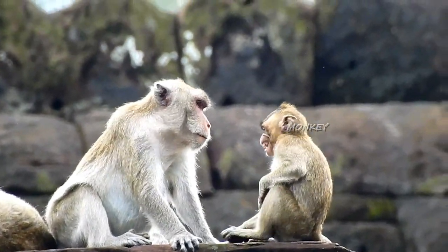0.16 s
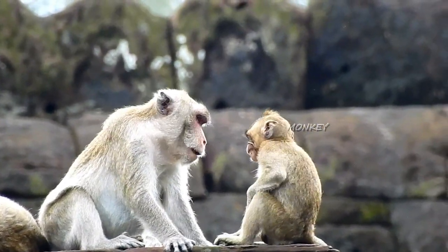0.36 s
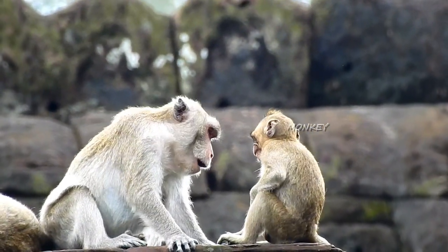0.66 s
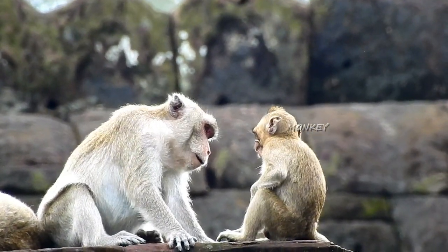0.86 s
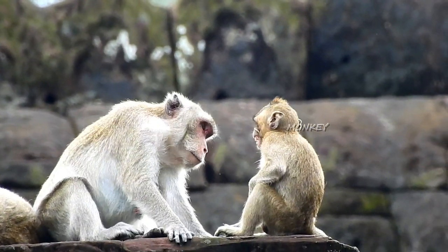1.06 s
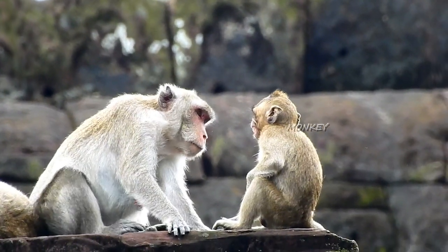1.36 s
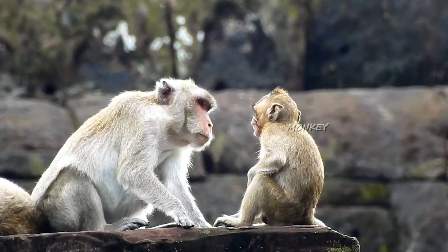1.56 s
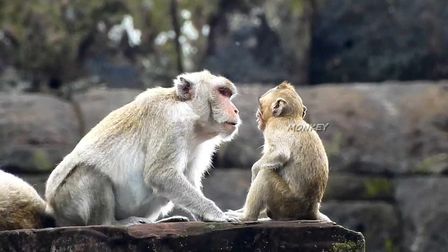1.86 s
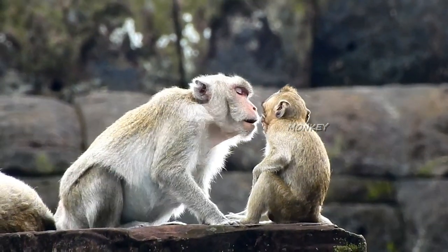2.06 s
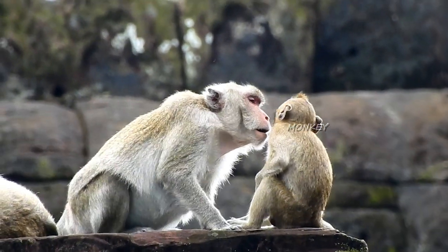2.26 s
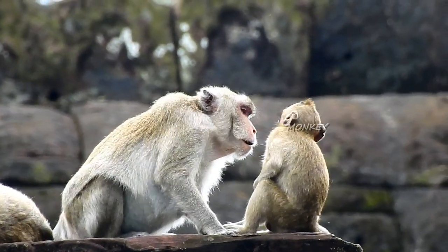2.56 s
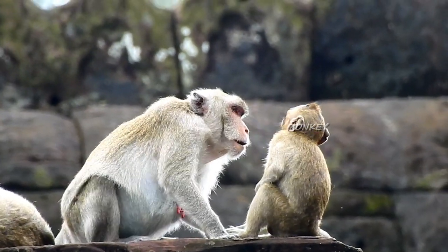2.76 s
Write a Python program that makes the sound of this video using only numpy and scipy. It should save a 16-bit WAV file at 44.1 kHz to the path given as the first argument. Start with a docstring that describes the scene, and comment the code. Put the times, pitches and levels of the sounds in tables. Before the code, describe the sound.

A young monkey gives high squeaks and hissing rasps, then a long thin cry and a hoarse one. Soft ticks and scuffs fall in between, heard close by over a faint outdoor hush with distant insects.

```python
"""Outdoors, over a low rumble, a hush and far insects, a young macaque squeaks and rasps on a stone ledge.
Soft ticks, smacks and scuffs of its hands and feet fall in between. Then it gives two long cries,
first a thin clear one, then a hoarse one, and at the end a far animal whistles.
Squeaks and cries are a buzzing voice box shaped by throat and mouth; the rasp is only hissing air.
Two closely spaced microphones hear the monkey from one side, with short echoes off the stone."""
import sys
import numpy as np
from scipy import signal
from scipy.fft import rfft, irfft
from scipy.io import wavfile
from scipy.ndimage import uniform_filter1d, map_coordinates

SR = 44100
rng = np.random.default_rng(int(sys.argv[2]) if len(sys.argv) > 2 else 0)


def to_wav(sig):
    """Store sig (one row per channel, or 1-D mono) as 16-bit WAV at the path in sys.argv[1].

    Samples outside -1..1 are clipped; the rate is SR.
    """
    pcm = np.clip(np.atleast_2d(sig), -1, 1) * 32767
    pcm = np.round(pcm).astype(np.int16)
    wavfile.write(sys.argv[1], SR, pcm.T)  # frames by channels


N = 127890
T = np.arange(N) / SR
HZ = np.maximum(np.fft.rfftfreq(2 * N, 1 / SR), 1)
CUTOFF_HZ = 15700


def from_db(db):
    """Turn decibels into a number to multiply by."""
    return 10 ** (np.asarray(db) / 20)


def rms_one(x):
    """Scale a signal so that its average strength (rms) is 1."""
    return x / np.sqrt(np.mean(x ** 2) + 1e-20)


def in_time(rows):
    """Join a table's rows with straight lines: one curve for each column after the time."""
    times, *columns = np.transpose(rows)
    return [np.interp(T, times, column) for column in columns]


def at_hz(points, hz, column=1):
    """Read a table between its frequencies, giving every octave equal room."""
    table = np.array(points)
    return np.interp(np.log(hz), np.log(table[:, 0]), table[:, column])


def shaped(x, response):
    """Filter a sound: multiply each frequency by its own gain."""
    return irfft(rfft(x, 2 * N) * response)[..., :N]


def noise(colour):
    """Noise of strength 1; its colour is a table of the level at each frequency."""
    return rms_one(shaped(rng.standard_normal(N), from_db(at_hz(colour, HZ))))


def drift(hz):
    """A random wobble of strength 1, mostly slower than hz."""
    return rms_one(shaped(rng.standard_normal(N), 1 / (1 + (HZ / hz) ** 2)))


def resonate(x, hz, width_hz):
    """A resonance: it passes sound near hz and weakens the rest."""
    r = np.exp(-np.pi * width_hz / SR)
    feed = np.array([1, 0, -1]) * (1 - r * r) / 2
    feedback = [1, -2 * r * np.cos(2 * np.pi * hz / SR), r * r]
    return signal.lfilter(feed, feedback, x + 1e-18)


def rumble():
    """A far, low rumble that slowly swells and fades."""
    # Loudness of the rumble: t/s, level/dB
    swell = [(0, -76), (1.3, -69.5), (2.0, -81)]
    # Colour of the rumble: f/Hz, level/dB
    colour = [(50, -13), (150, 1), (190, -2.5), (300, -15.5), (2000, -31.5)]
    return from_db(in_time(swell)[0]) * noise(colour)


def outdoors(insect_hz=2994, insect_width_hz=450, insect_db=-67.5):
    """The open-air hush ebbs and swells; far insects add a steady, narrow band of hiss."""
    # Loudness of the hush: t/s, level/dB
    swell = [(0, -70), (.33, -77), (.65, -68.5), (1.25, -76), (1.62, -65.5), (1.77, -72.5), (2.32, -64.5),
             (2.62, -72.5)]
    # Colour of the hush: f/Hz, level/dB
    colour = [(350, -5), (900, -1), (2300, 3), (4000, -8.5), (9000, -37), (15500, -83)]
    insects = resonate(rng.standard_normal(N), insect_hz, insect_width_hz)
    insects = rms_one(resonate(insects, insect_hz, 2 * insect_width_hz))
    return from_db(in_time(swell)[0]) * noise(colour) + from_db(insect_db) * insects


def whistle():
    """A far animal's pure note, blurred because it arrives along many paths."""
    # Course of the whistle: t/s, pitch/Hz, level/dB
    course = [(2.635, 2712, -69.5), (2.67, 2860, -57), (2.70, 3263, -52.5), (2.735, 3040, -63.5),
              (2.9, 2453, -72)]
    pitch, db = in_time(course)
    blur = drift(130) + 1j * drift(130)  # wobbles both level and phase
    note = np.exp(2j * np.pi * np.cumsum(pitch) / SR)
    return from_db(db) * (T > course[0][0]) * np.imag(blur * note)


def scuffs():
    """Hands and feet shift on the stone, each time making a grainy swell of noise."""
    # Rubs on the stone: middle/s, length/s, centre/Hz, level/dB
    rubs = [(.01, 0.078, 1770, -57), (0.535, 0.086, 1160, -66.5), (0.849, .1, 1905, -55),
            (1.288, 0.056, 657.5, -66), (2.334, 0.082, 1001, -65)]
    grain = rng.standard_normal(N) * from_db(1.45 * drift(80))
    out = 0
    for middle, length, hz, db in rubs:
        band = resonate(resonate(grain, hz, 0.74 * hz), hz, 2 * hz)
        swell = np.exp(-2 * ((T - middle) / length) ** 2)
        out = out + from_db(db) * swell * rms_one(band)
    return out


def noise_bursts(rows, width):
    """Quickly dying bursts of noise, each in a band whose width is a share of its centre frequency."""
    out = 0
    for start, hz, db, decay in rows:
        burst = rng.standard_normal(N) * (T >= start) * np.exp(-np.abs(T - start) / decay)
        band = resonate(resonate(burst, hz, hz), hz, width * hz)
        length_scale = np.sqrt(decay * SR / 2 / N)  # so db sets the burst's start, not its average
        out = out + from_db(db) * rms_one(band) * length_scale
    return out


def ticks():
    """Tiny sharp ticks: noise that rings for a moment in a narrow band."""
    # One row a tick: t/s, centre/Hz, level/dB, decay/s
    clicks = [(.1545, 5900, -34, 0.00091), (1.2645, 4080, -42, 0.0011), (2.627, 5190, -32, 0.0031),
              (2.6975, 3710, -35.5, 0.00091)]
    return noise_bursts(clicks, width=0.13)


def smacks(attack_s=0.00083, noise_db=-2):
    """Soft pops: a small hollow space rings briefly, with some noise."""
    # One row a smack: t/s, centre/Hz, level/dB, decay/s
    pops = [(.497, 908, -49, 0.0021), (0.767, 1710, -43, .012), (.811, 1775, -44, 0.0069),
            (.838, 846, -49, 0.0052), (0.862, 1887, -43.5, 0.0041), (1.561, 1880, -41, 0.0046)]
    rings = 0
    for start, hz, db, decay in pops:
        age = T - start
        envelope = np.clip(age / attack_s, 0, 1) * np.exp(-np.abs(age) / decay)
        rings = rings + from_db(db) * envelope * np.sqrt(2) * np.sin(2 * np.pi * hz * age)
    return rings + from_db(noise_db) * noise_bursts(pops, width=0.26)


def rasp(flutter_db=1.5, flutter_hz=161):
    """Air hisses and flutters through the monkey's mouth, with no voice in it."""
    # Loudness of the hiss: t/s, level/dB
    effort = [(0, -65.5), (.215, -66.5), (.295, -46), (.345, -49.5), (.47, -49.5), (.615, -60.5),
              (.626, -44), (.69, -43), (.755, -50), (.81, -45.5), (.86, -50), (.95, -65), (.985, -56),
              (1.09, -59.5), (1.17, -46), (1.21, -66), (1.31, -64.5), (2.6, -86), (2.675, -61.5),
              (2.76, -91)]
    # Colour of the hiss: f/Hz, level/dB
    colour = [(2200, -21), (3400, -6.5), (4000, 1.5), (5700, 3.5), (6800, -2.5), (8300, -12),
              (11000, -21.5), (15500, -46)]
    return from_db(in_time(effort)[0] + flutter_db * drift(flutter_hz)) * noise(colour)


def voice(pitch, gain, rough, throat, air_db, harmonics, mouth=1):
    """An unsteady voice box and rushing air sound through the throat; mouth shifts its resonances."""
    lowest_hz, fray_above_hz, smear_hz = 2600, 5800, 260
    hold_s, flutter_db = 0.0044, 3
    rough = np.clip(rough, 0, 1)  # 0 is clear, 1 is fully rough
    jitter = 0.035 * rough * drift(250)
    waver = 0.007 * drift(90)
    phase = 2 * np.pi * np.cumsum(pitch * (1 + jitter + waver)) / SR
    # Harmonics are tones at whole multiples of the pitch; the throat sets their strengths.
    k = np.arange(1, harmonics + 1)[:, None]
    in_range = (k * pitch > lowest_hz) * (k * pitch < CUTOFF_HZ)
    strengths = from_db(at_hz(throat, k * pitch / mouth)) * in_range
    # Roughness smears each harmonic into a band of noise, the high ones most.
    fraying = np.maximum(k * pitch.mean() / fray_above_hz, 1) ** 2
    widths_hz = smear_hz * np.sqrt(fraying[:, 0])
    smear = np.array([drift(hz) + 1j * drift(hz) for hz in widths_hz]) / np.sqrt(2)
    noisy = np.minimum(rough * fraying, 1)
    waves = np.imag((np.sqrt(1 - noisy ** 2) + noisy * smear) * np.exp(1j * k * phase))
    tone = (strengths * waves).sum(0) / np.sqrt((strengths ** 2).sum(0) / 2)
    # Reading the air noise faster or slower shifts its resonances too.
    air = map_coordinates(noise(throat), [np.cumsum(mouth * np.ones(N))], order=5, mode="wrap")
    sound = tone + from_db(air_db) * rough * air
    # A strained voice holds its level: even it out, then add a fast flutter.
    even = sound / np.sqrt(uniform_filter1d(sound ** 2, int(hold_s * SR)) + 1e-12)
    return gain * even * from_db(flutter_db * rough * np.tanh(drift(210)))


def squeaks():
    """Short bursts of voice that slide in pitch, each with a rounded rise and fall."""
    # One row a squeak: t/s, length/s, first pitch/Hz, last pitch/Hz, level/dB, roughness
    calls = [(.045, .048, 5755, 5040, -53, 1.07), (.222, 0.019, 4307, 3685, -43, 0.46),
             (.230, 0.026, 4900, 5300, -30, 0.96), (.257, 0.016, 6310, 5010, -33, 0.49),
             (.396, 0.0083, 5600, 4772, -27, 0.37), (.408, 0.021, 5500, 5250, -27, 0.77),
             (.428, 0.012, 5230, 4750, -30.5, 0.52), (.444, .025, 4700, 3700, -40.5, 0.74),
             (.608, 0.016, 3230, 4744, -48.5, 0.7), (.623, 0.017, 4310, 3670, -37.5, 0.68),
             (.815, 0.032, 4376, 3840, -44, 0.5), (.868, 0.036, 6120, 5810, -45.5, 0.44),
             (.962, 0.028, 3300, 4900, -47.5, 0.41), (1.124, 0.066, 5340, 4710, -39.5, 0.84),
             (1.165, .023, 4365, 3700, -39, 0.26), (1.320, 0.024, 4430, 5440, -35.5, 0.72),
             (1.335, 0.083, 5700, 5800, -31, 0.77)]
    # Colour of throat and mouth: f/Hz, level/dB
    throat = [(400, 9), (2300, -25), (3900, -9), (5200, -3), (6700, -10.5), (7500, -22), (9000, -32),
              (10300, -24), (12800, -46), (15300, -42)]
    pitch, gain, rough = np.full(N, calls[0][2], float), np.zeros(N), np.zeros(N)
    for start, length, from_hz, to_hz, db, roughness in calls:
        progress = np.clip((T - start) / length, 0, 1)
        burst = from_db(db) * np.sqrt(4 * progress * (1 - progress))
        slide = from_hz + (to_hz - from_hz) * progress
        louder = burst > gain  # where squeaks overlap, the louder one wins
        pitch[louder], gain[louder], rough[louder] = slide[louder], burst[louder], roughness
    return voice(pitch, gain, rough, throat, air_db=-4, harmonics=4)


def cry(course, throat, air_db, follow):
    """One long call; follow sets how much the mouth's resonances move with the pitch."""
    pitch, db, rough = in_time(course)
    mouth = (pitch / np.mean([row[1] for row in course])) ** follow
    gain = from_db(db) * (T > course[0][0]) * (T < course[-1][0])
    return voice(pitch, gain, rough, throat, air_db, harmonics=12, mouth=mouth)


def thin_cry():
    """A high, thin cry through a mouth that keeps its shape."""
    # Course of the cry: t/s, pitch/Hz, level/dB, roughness
    course = [(1.375, 2170, -50, 0.92), (1.420, 2190, -43, 0.94), (1.462, 2184, -47.5, 0.15),
              (1.516, 2381, -43, 0.5), (1.611, 2360, -43, 0.23), (1.622, 2183, -50.5, 0.26),
              (1.685, 2185, -47.5, 0.27), (1.693, 2190, -43.5, 0.72), (1.712, 2070, -44.5, 0.07),
              (1.750, 2000, -43, 0.13), (1.775, 2208, -44.5, 0.44), (1.802, 2178, -44, 0.29),
              (1.897, 2226, -45, 0.19), (1.917, 2194, -39, .1), (1.933, 2090, -65.5, .2)]
    # Colour of throat and mouth: f/Hz, level/dB
    throat = [(3400, -38.5), (4050, -7), (4400, 6.5), (5000, 0.5), (5900, 2), (6600, -2.5), (7300, -14),
              (8500, -9.5), (11000, -24), (15500, -52)]
    return cry(course, throat, air_db=4.5, follow=0)


def hoarse_cry():
    """A lower, rougher cry; the mouth's resonances sink as the pitch falls."""
    # Course of the cry: t/s, pitch/Hz, level/dB, roughness
    course = [(2.084, 1271, -54, 0.57), (2.093, 1415, -35.5, 0.71), (2.108, 1551, -39.5, 0.82),
              (2.16, 1490, -39, 0.46), (2.262, 1429, -39, 0.14), (2.300, 1427, -41.5, 0.91),
              (2.475, 1348, -42.5, 0.53), (2.520, 1291, -37.5, 0.83), (2.637, 1225, -44, 0.66),
              (2.644, 1252, -74, 0.49)]
    # Colour of throat and mouth: f/Hz, level/dB
    throat = [(3600, -19), (4400, 0), (5250, 9.5), (5750, -2), (6400, -15.5), (7100, -2.5), (7550, -33),
              (8600, -50), (10200, -21.5), (11100, -25.5), (11850, -38), (13200, -65), (15000, -40)]
    return cry(course, throat, air_db=1.5, follow=0.37)


def walls(x, level_db=-7.5, fade_s=0.27, delay_s=0.0038, dull_above_hz=5100):
    """The stonework scatters the sound into dull echoes, different at each microphone."""
    tail = rng.standard_normal((2, N)) * from_db(-60 * T / fade_s) * (T > delay_s)
    tail = rms_one(tail) / np.sqrt(N)
    response = rfft(tail, 2 * N) / np.sqrt(1 + (HZ / dull_above_hz) ** 4)
    return from_db(level_db) * shaped(x, response)


def microphones(x):
    """Sound from one side reaches the two microphones out of step and unequally loud."""
    # Left microphone compared with the right: f/Hz, phase lead/rad, level/dB
    balance = [(3100, 0, 1), (4300, -1.1, 3), (5200, -1.95, 5.6), (6000, -2.15, 3.3), (7500, -2.65, 1.5)]
    half = np.exp(.5j * at_hz(balance, HZ)) * from_db(at_hz(balance, HZ, column=2) / 2)
    return shaped(x, np.array([half, 1 / half]))


def scene():
    """The monkey close by, its echoes and the open air, as left and right channels."""
    calls = squeaks() + thin_cry() + hoarse_cry() + rasp()
    # The calls are thinned out below about 4 kHz.
    calls = signal.sosfilt(signal.butter(2, 4000, "high", fs=SR, output="sos"), calls)
    sources = calls + ticks() + scuffs() + whistle()
    pops = smacks()
    sides = np.array([[1], [-1]])  # left, right
    direct = microphones(sources + outdoors() + rumble())
    direct += pops * from_db(-2 * sides)  # the smacks lean to the right
    echoes = walls(sources + pops)
    wide_air = from_db(-8) * outdoors() * sides
    return direct + echoes + wide_air


def record(dry):
    """Cut off the highest treble steeply."""
    return shaped(dry, 1 / np.sqrt(1 + (HZ / CUTOFF_HZ) ** 200))


dry = scene()
out = record(dry)
to_wav(out)
```